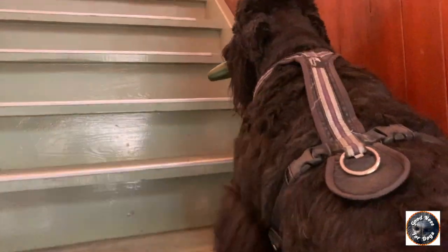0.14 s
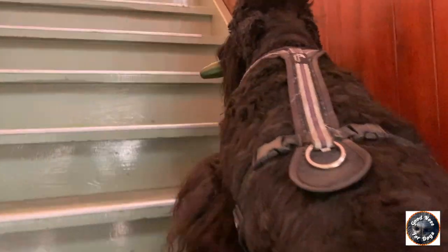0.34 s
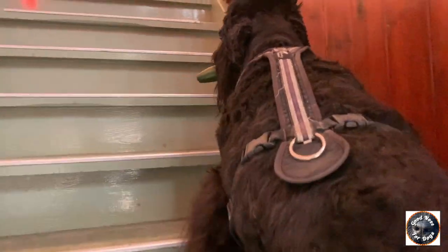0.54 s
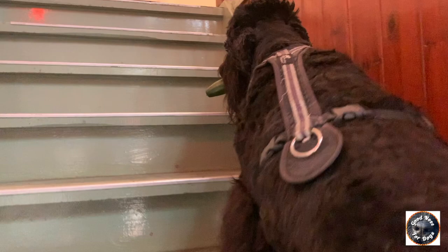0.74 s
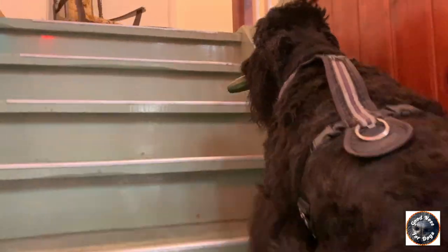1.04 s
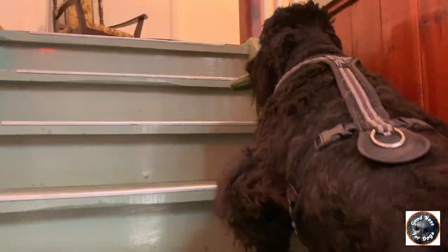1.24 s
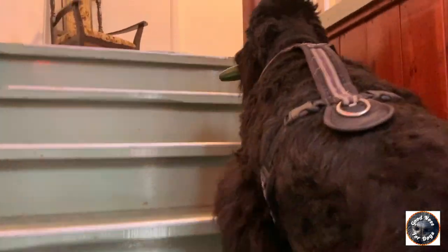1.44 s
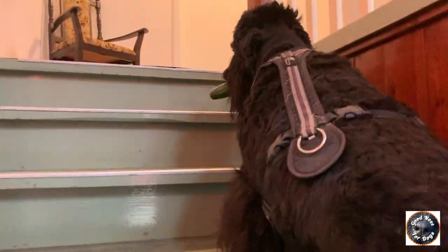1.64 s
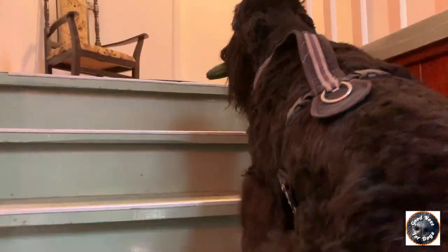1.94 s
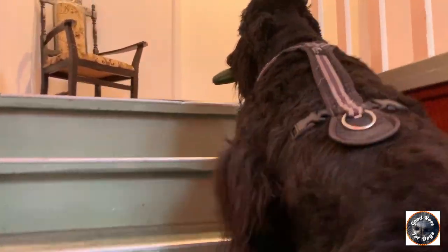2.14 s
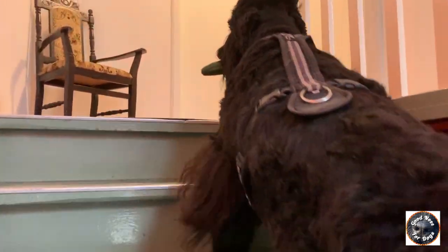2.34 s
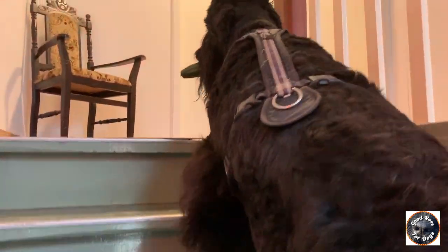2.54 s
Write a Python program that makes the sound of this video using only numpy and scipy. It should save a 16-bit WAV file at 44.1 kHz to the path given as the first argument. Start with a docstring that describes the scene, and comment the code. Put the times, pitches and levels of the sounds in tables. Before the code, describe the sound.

Dog footsteps on a wooden staircase: a sharp claw tick and a hollow thump open an irregular run of taps and booming knocks just ahead of the microphone. A light harness rustle comes and goes in the slightly echoing stairwell.

```python
"""A sharp tick and a hollow thump come first: a large dog is climbing a wooden staircase, just ahead of us.
Its soft paw pads push on the treads and set the whole stair booming. Its claws tick and scrape on the
paint and make the treads ring briefly. Fur and harness rustle as it moves. The panelled stairwell adds
a short echo to the steps, and a faint rumble of the room lies under everything."""
import sys
import numpy as np
from scipy import signal
from scipy.fft import rfft, irfft
from scipy.io import wavfile

SR = 44100
rng = np.random.default_rng(int(sys.argv[2]) if len(sys.argv) > 2 else 0)


def transcribe(signal):
    """Save signal, clipped to [-1, 1], as a 16-bit WAV file at the path in sys.argv[1]."""
    frames = np.atleast_2d(signal).T
    limited = np.clip(frames, -1, 1)
    pcm = np.round(limited * 32767).astype(np.int16)
    wavfile.write(sys.argv[1], SR, pcm)


N = 119070  # 2.7 s


def from_db(db):
    """Turn decibels into a number to multiply by."""
    return 10 ** (np.asarray(db) / 20)


def rms_one(x):
    """Scale a sound so that its average strength (rms) is 1."""
    return x / np.sqrt(np.mean(x ** 2) + 1e-20)


def even(x, length):
    """Give a burst the energy of a sound that holds rms 1 for length seconds."""
    return x * np.sqrt(length * SR / np.sum(x ** 2))


def at_hz(table, hz):
    """Read between the rows of a table of frequencies and values."""
    freqs, values = np.transpose(table)
    return np.interp(np.log(hz), np.log(freqs), values)


def drift(rate_hz):
    """A smooth random wobble of rms 1; a higher rate wobbles faster."""
    step = 40  # samples between computed points
    r = np.exp(-2 * np.pi * step * rate_hz / SR)
    slow = signal.lfilter([1], [1, -2 * r, r * r], rng.standard_normal(N // step + 2002))[2000:]
    return np.interp(np.arange(N) / step, np.arange(len(slow)), rms_one(slow))


def filtered(x, hz, kind="band", order=2):
    """Keep what lies below hz ("low"), above it ("high") or between two frequencies ("band")."""
    return signal.sosfilt(signal.butter(order, hz, kind, fs=SR, output="sos"), x)


def ring(x, hz, t60):
    """Let x set a tone ringing, like tapped wood; it fades by 60 dB in t60 seconds."""
    r = from_db(-60 / (t60 * SR))
    w = 2 * np.pi * hz / SR
    return signal.lfilter([0, np.sin(w)], [1, -2 * r * np.cos(w), r * r], x + 1e-18)


def add(out, x, start_s):
    """Mix x into out from the given time."""
    i = int(start_s * SR)
    out[..., i:i + x.shape[-1]] += x[..., :N - i]


def late(x, delay_s):
    """Delay a sound, even by part of a sample."""
    return irfft(rfft(x) * np.exp(-2j * np.pi * delay_s * np.fft.rfftfreq(N, 1 / SR)), N)


def contact(length, noise, rise_s=0.0015):
    """The uneven force of a touch: it rises fast and fades after about length seconds; energy 1."""
    t = np.arange(len(noise)) / SR
    force = noise * (1 - np.exp(-t / rise_s)) * np.exp(-(t / length) ** 2 / 2)
    return force / np.sqrt(np.sum(force ** 2))


# How alike the noise is on the left and right: f/Hz, likeness (1 = the same, 0 = unrelated)
LIKENESS = [(60, 1), (150, 0.64), (400, 0.71), (1000, 0.011)]
def banded_noise(spectrum, flicker_db):
    """Stereo noise in half-octave bands, each with its own level, flicker and likeness; rms 1."""
    out, shared_wobble = 0, drift(4.0)
    edges = 25 * 2 ** np.arange(0, 9.6, .5)
    white = rng.standard_normal((2, 2, N))
    for k, (low, high) in enumerate(zip(edges, edges[1:])):
        mid, side = filtered(white[k % 2], (low, high))
        hz = np.sqrt(low * high)
        alike = at_hz(LIKENESS, hz)
        gain = from_db(at_hz(spectrum, hz) + flicker_db * (.4 * shared_wobble + drift(20)))
        out = out + gain * (np.sqrt(1 + alike) * mid + np.sqrt(1 - alike) * side * [[1], [-1]])
    return rms_one(out)


# The room's background noise, from bass to treble: f/Hz, relative level/dB
ROOM_SPECTRUM = [(18, -53), (30, 8), (74, 0.5), (229, -18), (352, -8.5), (777, -25.5), (1140, -14.5),
                 (5000, -30), (6500, -35), (11000, -120)]
def room_tone():
    """A faint, wavering rumble fills the room."""
    return from_db(-44.5) * banded_noise(ROOM_SPECTRUM, flicker_db=4.0)


def stairwell(x, low_t60=0.36, treble_t60=0.22, split_hz=1400, build_s=0.006):
    """Sound bounces between the panelled walls and blurs into an echo whose treble dies first."""
    t = np.arange(SR // 2) / SR
    white = rng.standard_normal((2, len(t)))
    low = filtered(white, split_hz, "low")
    tail = low * from_db(-60 * t / low_t60) + (white - low) * from_db(-60 * t / treble_t60)
    tail *= 1 - np.exp(-t / build_s)
    tail /= np.sqrt(np.sum(tail ** 2, axis=1, keepdims=True))
    return signal.fftconvolve(x[None], tail, axes=1)[:, :N]


# How loud the fur and harness are as the dog moves: t/s, level/dB
RUSTLE_LEVELS = [(0, -59.5), (0.051, -69), (.3, -66), (.45, -58), (.68, -64), (.8, -52), (1.02, -59),
                 (1.2, -58.5), (1.33, -63), (1.45, -50), (1.58, -55), (1.65, -68), (1.77, -59.5),
                 (1.85, -54.5), (1.99, -60), (2.099, -77), (2.2, -66), (2.302, -48.5), (2.45, -54.5),
                 (2.54, -56), (2.7, -52.5)]
# The rustle, from bass to treble: f/Hz, relative level/dB
RUSTLE_SPECTRUM = [(400, -8), (1000, -10.5), (2500, -10), (5000, -8.5), (8500, -11.5), (11000, -19),
                   (16000, -21)]
def rustle(grain_db=2):
    """Fur and harness rub in swells of hiss; separate hairs and straps make it flicker fast."""
    swell_db = np.interp(np.arange(N) / SR, *np.transpose(RUSTLE_LEVELS))
    gain = from_db(swell_db + grain_db * drift(200))
    return gain * banded_noise(RUSTLE_SPECTRUM, flicker_db=4.5)


# Claws striking or scraping: t/s, knock level/dB, click level/dB, hiss level/dB, length/s,
# the tread's ring f/Hz, ring level/dB
CLAW_STRIKES = [(0.12, -32, -33.5, -48, 0.005, 868, -37), (0.377, -46, -55.5, -62, 0.0081, 571, -43.5),
                (0.48, -42.5, -48, -45, 0.0069, 1050, -57), (0.586, -44, -48, -51.5, 0.0039, 868, -39),
                (0.71, -38, -49.5, -44, 0.008, 2095, -36), (0.722, -46, -40.5, -45, 0.0095, 2400, -44),
                (0.779, -41, -60, -80, 0.0035, 3610, -45), (0.875, -31, -40, -41, 0.0051, 613, -28),
                (1.055, -33, -27.5, -38.5, 0.004, 1490, -27), (1.264, -50, -51, -80, 0.0064, 2550, -49),
                (1.349, -33, -40, -48, 0.003, 1100, -28), (1.488, -40, -48, -47.5, 0.0085, 1260, -40),
                (1.502, -29.5, -45, -45, 0.0074, 1059, -35), (1.548, -56, -40, -65, 0.003, 2360, -42),
                (1.558, -52, -42, -60, 0.0027, 2920, -49), (1.675, -40, -41, -40, 0.0047, 2056, -33),
                (1.8, -69, -55, -54, 0.0072, 436, -37.5), (2.018, -49, -47.5, -48.5, 0.015, 2350, -59),
                (2.035, -37, -34, -48, 0.0054, 2262, -29), (2.207, -43, -51, -98, 0.0017, 1540, -46),
                (2.234, -52, -45, -83, 0.0064, 2340, -43.5), (2.325, -25, -35.5, -67, 0.0026, 568, -20),
                (2.328, -27, -52.5, -65, 0.016, 1374, -23.5), (2.56, -46, -46.5, -53.5, 0.0037, 4670, -46),
                (2.614, -38.5, -41.5, -52, 0.0028, 653, -31.5), (2.679, -40, -51, -45.5, 0.008, 913, -43.5)]
def claws(grain_db=4, tread_t60=0.023):
    """A hard claw makes a gritty tick on the paint and sets the tread ringing. Returns ticks, rings."""
    ticks, rings = np.zeros((2, N))
    bands_hz = [(480, 1900), (1900, 6000), (6000, 16000)]  # knock, click, hiss
    shape = (len(CLAW_STRIKES), SR // 8)
    grits = rng.standard_normal(shape) * from_db(grain_db * rng.standard_normal(shape))
    for (start_s, *levels_db, length, hz, ring_db), grit in zip(CLAW_STRIKES, grits):
        force = contact(length, grit)
        for db, edges in zip(levels_db, bands_hz):
            burst = filtered(filtered(force, edges), edges)
            add(ticks, from_db(db) * even(burst, length), start_s)
        tread = ring(contact(length, grit[::-1]), hz, tread_t60)
        tread = ring(tread, hz, tread_t60 / 2)  # a second pass makes the tone purer
        add(rings, from_db(ring_db) * even(tread, length), start_s)
    return ticks, rings


# The staircase's own tones, seven low and then six woody: f/Hz, relative level/dB, time to fade 60 dB/s
STAIR_TONES = [(104.6, -6.5, 0.61), (119.3, -11.5, 0.78), (156, -10, 0.1), (157.6, 2.5, 0.15),
               (181.2, -2, 0.39), (207.2, 8.5, 0.12), (249.7, 1, 0.081), (306, 6, 0.15), (343.4, 13, 0.11),
               (387, 12, 0.058), (522, 10, 0.056), (548, -9.5, 0.043), (425.8, -0.5, 0.084)]
# Paw pads landing: t/s, low thump level/dB, woody level/dB, deep boom level/dB, length of the push/s
PAD_LANDINGS = [(0.147, -35.5, -52.5, -25.5, 0.021), (0.208, -41.5, -53, -36, 0.014),
                (0.299, -46.5, -65, -29, 0.042), (0.385, -31.5, -51.5, -25, 0.011),
                (0.587, -38.5, -58.5, -35, 0.019), (0.711, -41, -48, -28, 0.024),
                (0.789, -34, -38.5, -20, 0.01), (0.813, -29, -59, -19, 0.0057),
                (0.878, -32.5, -44.5, -20.5, 0.031), (1.059, -46.5, -53.5, -47, 0.046),
                (1.354, -35, -39, -26, 0.0067), (1.371, -28, -32.5, -30, 0.0056),
                (1.5, -50.5, -41.5, -33, 0.031), (1.556, -42.5, -53, -57, 0.023),
                (1.799, -44.5, -44, -61, 0.022), (1.862, -47, -55, -56, 0.043),
                (1.925, -26, -37, -21.5, 0.046), (2.353, -32, -34.5, -53.5, 0.025),
                (2.472, -30.5, -38.5, -27.5, 0.037), (2.568, -34, -54, -29, 0.0053),
                (2.617, -43.5, -45.5, -30.5, 0.18)]
def pads(boom_hz=50.3, boom_t60=0.48, boom_push_s=0.0024):
    """Each soft, uneven push of a paw shakes the hollow stair: a woody thump over a deep boom."""
    out, size = np.zeros(N), SR // 2
    t = np.arange(size) / SR
    boom = ring(t * np.exp(-t / boom_push_s), boom_hz, boom_t60)
    boom /= np.abs(boom).max()
    for start_s, low_db, woody_db, boom_db, length in PAD_LANDINGS:
        push = contact(length, rng.standard_normal(size))
        tones = [from_db(db) * ring(push, hz, t60) for hz, db, t60 in STAIR_TONES]
        low = from_db(low_db) * even(sum(tones[:7]), length + .03)
        woody = from_db(woody_db) * even(sum(tones[7:]), length + .03)
        add(out, low + woody + from_db(boom_db) * boom, start_s)
    return out


def scene():
    """Mix the steps, their echo, the rustle and the room's rumble."""
    thumps = pads()
    ticks, rings = claws()
    steps = thumps + ticks + rings
    direct = np.array([steps, late(steps, delay_s=0.00029)])  # the stairs are nearer the left side
    upper_thumps = filtered(thumps, 280, "high")
    echo = stairwell(from_db(-3.5) * upper_thumps + from_db(-5) * ticks + from_db(-7.5) * rings)
    return direct + echo + rustle() + room_tone()


def record(dry, shared_above_hz=7500, bass_cut_hz=63.7, top_cut_hz=15900):
    """Two close microphone openings share the treble, the left a little late; bass and top are cut."""
    share = 1 / (1 + (shared_above_hz / (np.fft.rfftfreq(N, 1 / SR) + 1)) ** 12)
    treble = irfft(rfft(dry[0]) * share, N)
    below = irfft(rfft(dry) * np.sqrt(1 - share ** 2), N)
    both = below + [late(treble, delay_s=.0002163), treble]
    both = filtered(both, bass_cut_hz, "high", order=4)
    return signal.sosfilt(signal.ellip(10, .5, 55, top_cut_hz, fs=SR, output="sos"), both)


dry = scene()
out = record(dry)
transcribe(out)
```